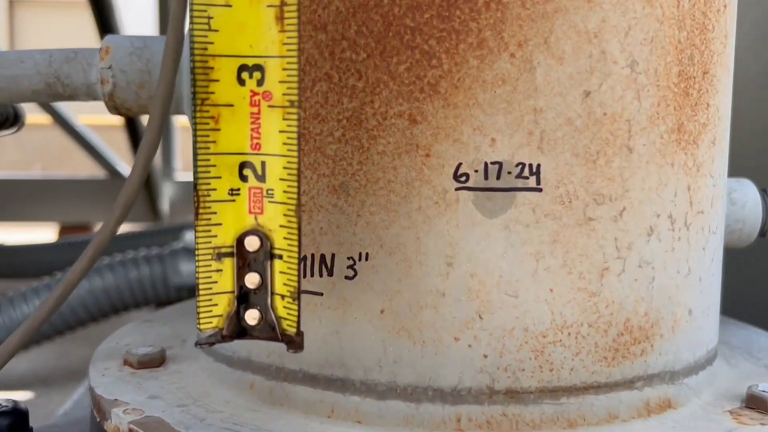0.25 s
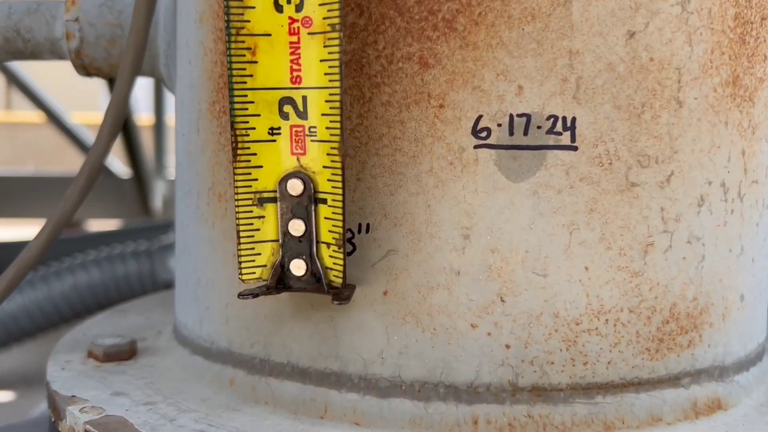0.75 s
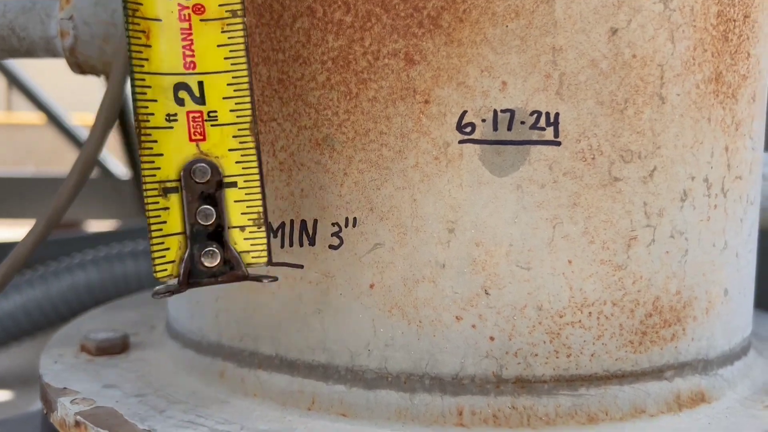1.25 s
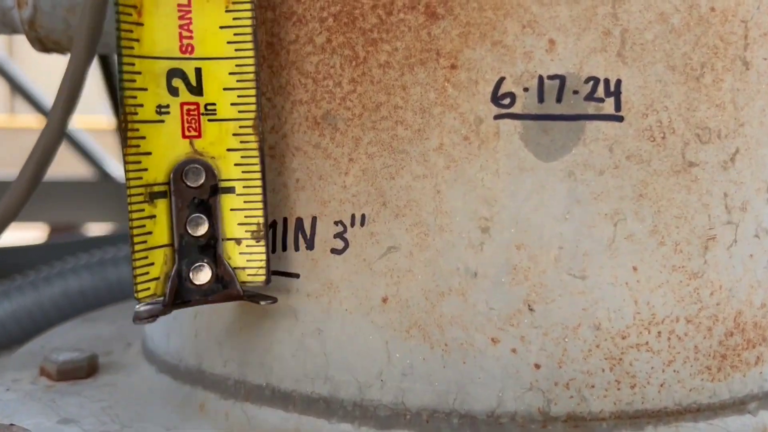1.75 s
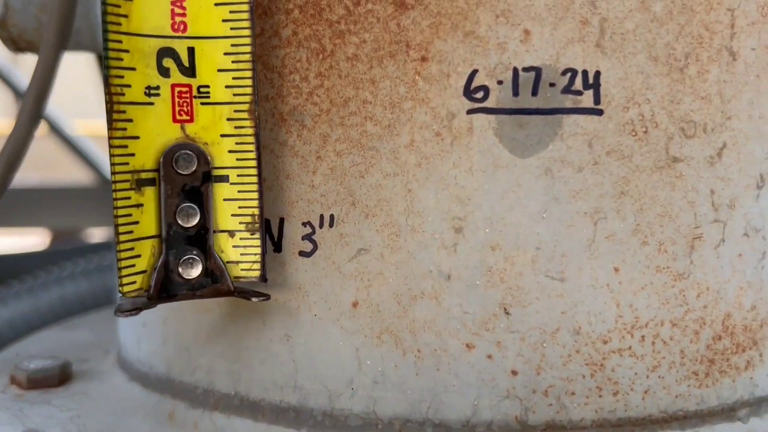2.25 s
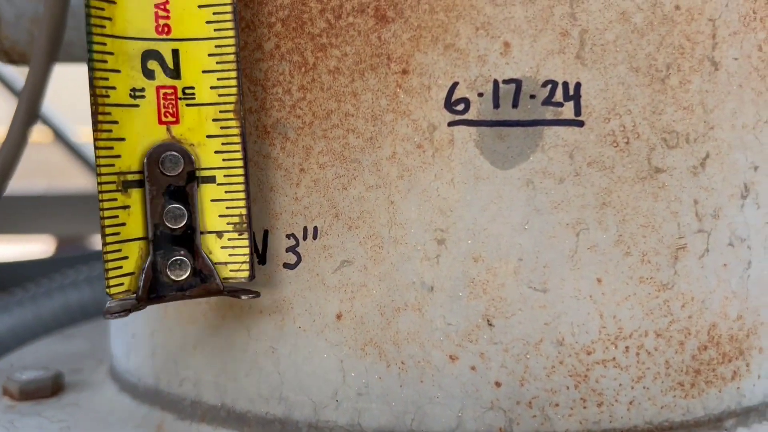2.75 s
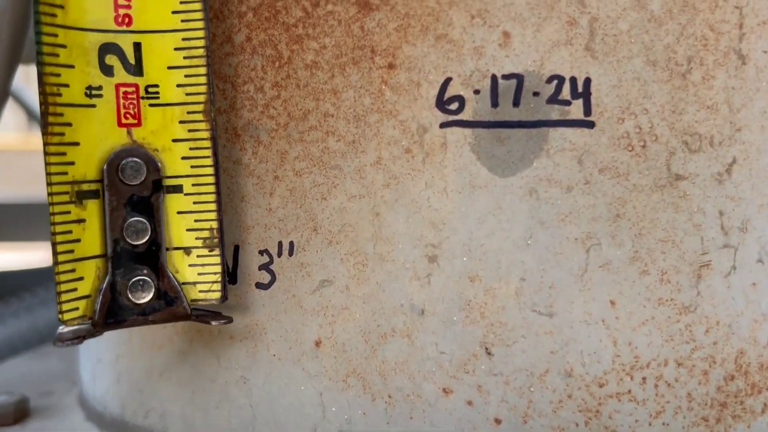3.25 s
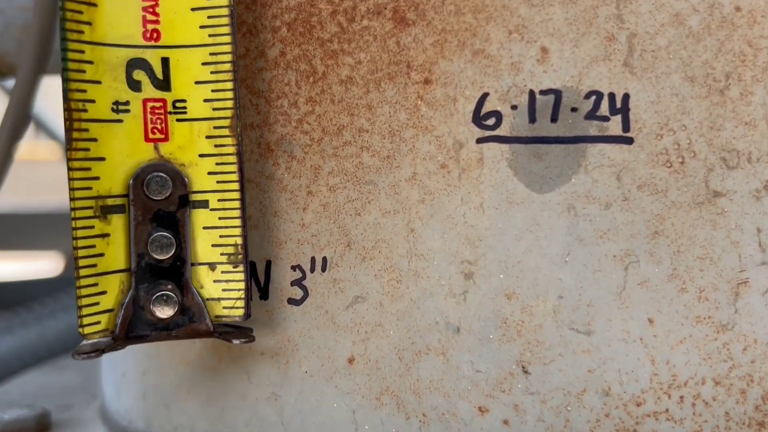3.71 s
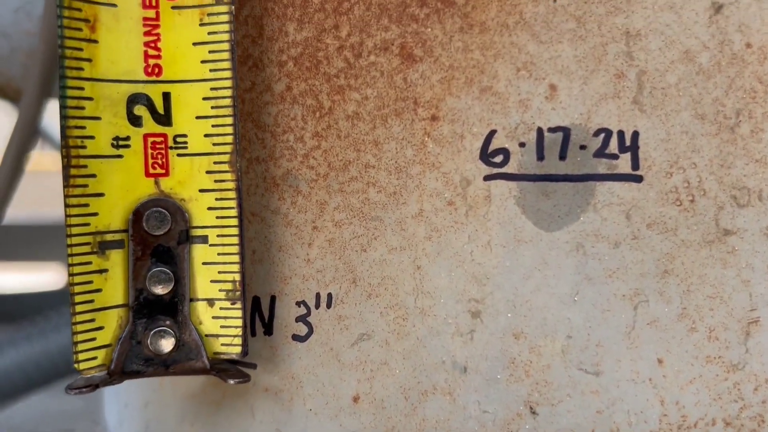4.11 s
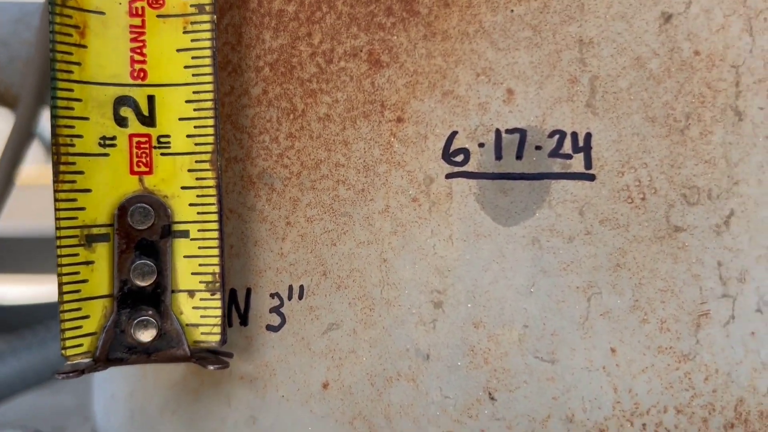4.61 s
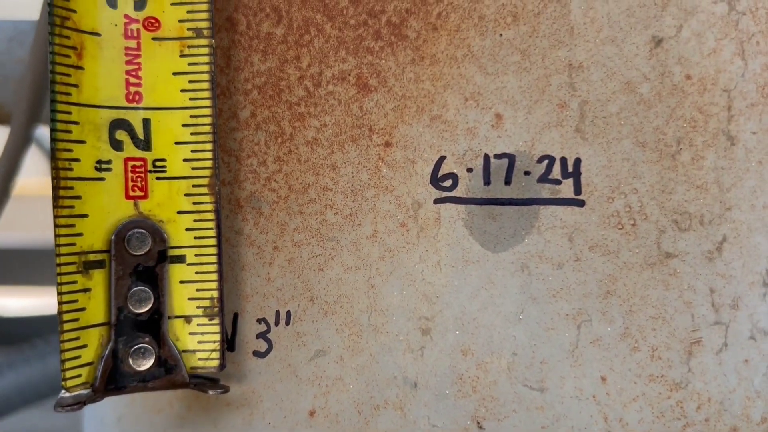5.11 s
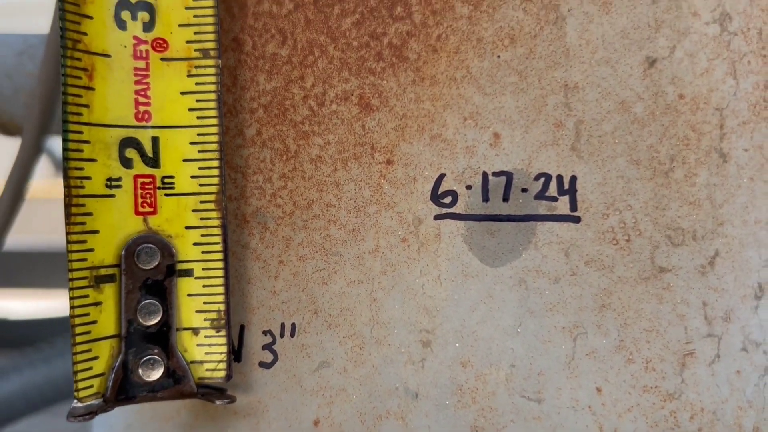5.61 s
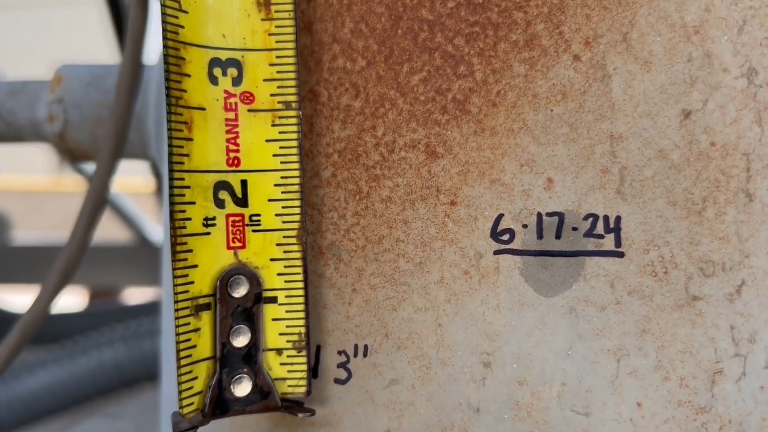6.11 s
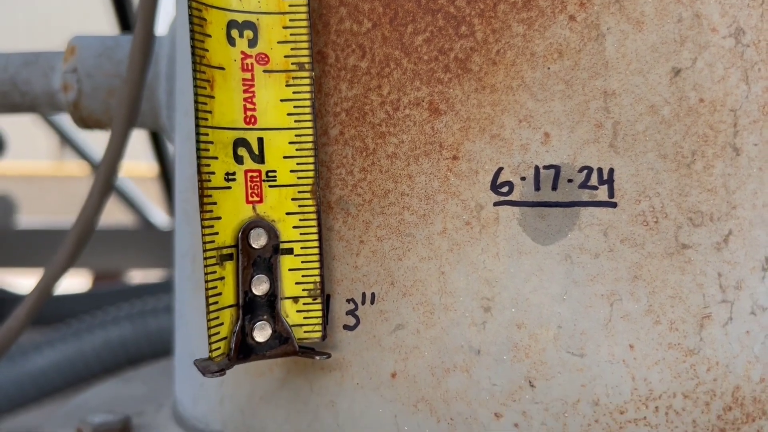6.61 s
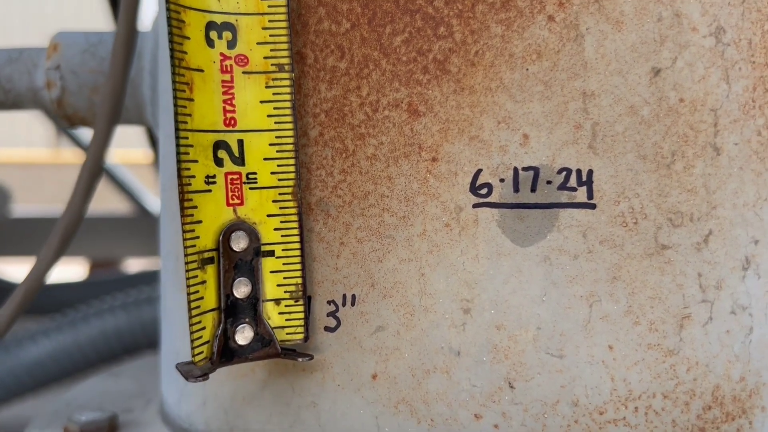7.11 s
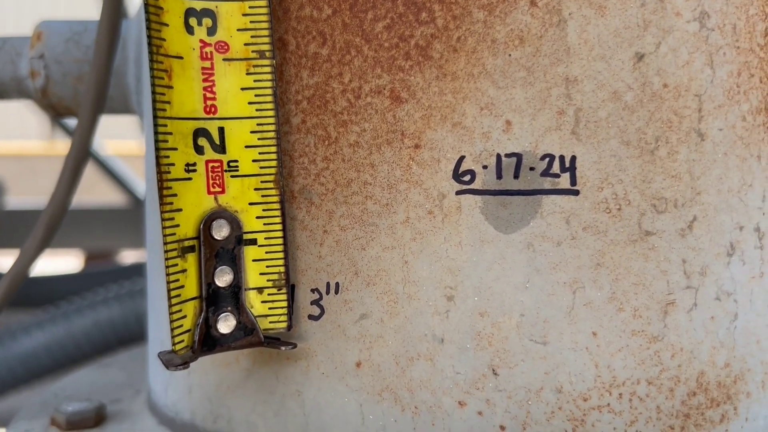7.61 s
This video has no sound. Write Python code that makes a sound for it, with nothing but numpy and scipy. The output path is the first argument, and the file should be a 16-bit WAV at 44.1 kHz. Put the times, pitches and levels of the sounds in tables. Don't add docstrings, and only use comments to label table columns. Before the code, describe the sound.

Close to a rooftop cooling machine, screw compressors drone and several fans throb low beneath a continuous broad rush of air and flowing refrigerant.

```python
import sys
import numpy as np
from scipy import signal
from scipy.fft import rfft, irfft, next_fast_len
from scipy.io import wavfile
from scipy.ndimage import uniform_filter1d

SR = 44100
rng = np.random.default_rng(int(sys.argv[2]) if len(sys.argv) > 2 else 0)


def invert_db(x):
    u = np.asarray(x, float) / 20
    return 10 ** u


def unload_wav(signal):
    wavfile.write(
        sys.argv[1],
        SR,
        np.round(np.clip(np.atleast_2d(signal).T, -1, 1) * 32767).astype(np.int16),
    )


N = 346273
SOUND_M_S = 343


def seconds():
    return np.arange(N) / SR


def walk(rate):
    hold = int(SR / rate)
    levels = np.repeat(rng.standard_normal(N // hold + 1), hold)
    slewed = uniform_filter1d(uniform_filter1d(levels, hold), hold)
    return 1.318 * slewed[:N]


def curve(table):
    s, value = np.transpose(table)
    return np.interp(seconds(), s, value)


def bumps(rows, width_s):
    return sum(db * np.exp(-((seconds() - s) / width_s) ** 2 / 2) for s, db in rows)


def shaft_angle(hz, wobble, rate):
    return 2 * np.pi * np.cumsum(hz * (1 + wobble * walk(rate))) / SR


def tone(angle, left_db, right_db, lead):
    left = invert_db(left_db) * np.sin(angle - lead)
    right = invert_db(right_db) * np.sin(angle)
    return np.sqrt(2) * np.array([left, right])


# frequency in Hz, level in dB per Hz, likeness of the ports from 0 to 1,
# right lead in radians, left minus right in dB.
ROAR_SPECTRUM = [(25, -76, .85, 0, -2), (49.7, -59.5, 1, 0, 4), (117, -49, 0.9, -0.15, -2.5),
                 (192, -52, 0.75, 0.49, -2), (349, -55.5, 0.74, 0.5, -0.5), (618, -57.5, 0.3, 3, -1),
                 (940, -62.5, 0.4, 3.5, -2), (1600, -65, 0.2, 4.5, -3.5), (1830, -69.5, 0.62, 7.5, 2.5),
                 (3700, -77.5, 0.34, 5, 2.5), (5260, -81.5, 0.46, 7.5, 5), (7300, -86.5, 0.7, 6.5, -0.5),
                 (9940, -88.5, 0.95, 9.5, 0), (16050, -96, 0.9, 15.7, .3)]
# time in seconds, level in dB.
REFRIGERANT_FLOW = [
    (0.0, -53),
    (0.22, -52.5),
    (4.0, -53.5),
    (4.09, -50.5),
    (4.22, -53.5),
    (4.3, -52),
    (5.73, -51),
    (7.34, -52),
    (7.39, -52),
    (7.85, -52),
]


def roar():
    size = next_fast_len(N)
    f = np.maximum(np.arange(size // 2 + 1) * SR / size, 1)
    hz, db, alike, lead, pan_db = np.transpose(ROAR_SPECTRUM)
    columns = (db, np.clip(alike, 0, 1), pan_db)
    db, alike, pan_db = (np.interp(np.log(f), np.log(hz), column) for column in columns)
    common, own = rfft(rng.standard_normal((2, size)))
    shared = alike * common * np.exp(1j * np.interp(f, hz, lead))
    right = shared + np.sqrt(1 - alike ** 2) * own
    air = np.array([common * invert_db(pan_db / 2), right * invert_db(-pan_db / 2)]) * invert_db(db) * np.sqrt(SR / 2)

    flow_db = curve(REFRIGERANT_FLOW)
    flow_db = flow_db - flow_db.mean()
    swell = walk(1.4)
    out = 0
    for centre in 20 * 2. ** np.arange(11):
        band = np.cos(np.pi / 2 * np.clip(np.log2(f / centre), -1, 1)) ** 2
        gust_db = 0.35 * swell + 0.72 * walk(10) + min(centre / 9000, 1) * flow_db
        out = out + invert_db(gust_db) * irfft(air * band, size)[:, :N]
    return out


# frequency in Hz, left in dB, right in dB, right lead in radians.
MOTOR_HUM = [(60.0, -43, -43, 0), (119.6, -46, -45, .2), (180.0, -48, -46, .3), (230.6, -49, -47, .3),
             (418.8, -45, -41, .5), (872.5, -49, -53, 3.1), (2708.3, -63, -68, -1.3),
             (3291.1, -60, -67, .1), (3651.3, -61, -66, 1.2), (6602.8, -68, -69, 0)]


def motor_hum():
    return sum(tone(2 * np.pi * hz * seconds(), *place) for hz, *place in MOTOR_HUM)


# blade tone in dB, its path in metres, second harmonic in dB, its path in metres.
FAN_TONES = [(-42, 0.69, -52, 2.36), (-55, 2.4, -47.5, 0.34), (-41.5, 6.17, -59, 1), (-45, 4.7, -43.5, 0.6),
             (-33.5, 1.65, -45, 2.46), (-33, 1.5, -47, 1.64), (-41, 2.2, -38, 2.38)]
BLADE_HZ = (56.749, 56.908, 57.034, 57.221, 57.452, 57.625, 57.746)
# time in seconds, change in dB.
FAN_SURGES = [
    (.55, 1),
    (1.55, 4.5),
    (2.0, -1),
    (2.65, 3),
    (6.5, -7),
    (7.7, 9),
]


def fans():
    t, out = seconds(), 0
    for hz, (db, path, second_db, second_path) in zip(BLADE_HZ, FAN_TONES):
        blade = 2 * np.pi * hz * (t - path / SOUND_M_S)
        second = 2 * 2 * np.pi * hz * (t - second_path / SOUND_M_S)
        out = out + tone(blade, db - 0.6, db + 0.5, 0.087)
        out = out + tone(second, second_db - 0.6, second_db + 0.5, 0.087)
        third_db = -46.5 + bumps(FAN_SURGES, width_s=0.15) + 2.24 * walk(4)
        third = 3 * shaft_angle(hz, wobble=0.006, rate=3.03)
        out = out + tone(third, third_db, third_db - 0.6, 0.1)
    return out


# shaft order, left in dB, right in dB, right lead
# in radians, far machines minus near in dB.
WEAK_ORDERS = [(9, -42, -43, 2.3, -4), (11, -46, -44.5, 2.2, -5), (15, -42, -41, -2.6, -2),
               (16, -55, -53, -2.7, -4), (19, -51, -51, -1.5, -4), (21, -52, -49, -.7, -4),
               (26, -49, -45.5, -2.2, -4), (28, -44, -48.5, .4, -3), (29, -55, -61, -.4, -6),
               (31, -46.5, -57, -.8, -11), (33, -57, -61, -.6, -6), (35, -46, -53, -.1, -8),
               (37, -56.5, -59, -.7, -6), (45, -53, -55, -.7, -3), (49, -61, -64, -.9, -6),
               (50, -51, -50.5, -.7, -4), (55, -56, -57.5, -1.2, -4), (60, -56, -57, -1.4, -4),
                    (65, -57, -59, -1.4, -5), (69, -66, -70, -.6, -5), (70, -59, -62.5, .2, -4),
                    (75, -56.5, -60, .5, -4), (80, -61, -63, -.2, -4), (85, -61, -64.5, -1.1, -4),
                    (90, -64, -69, .2, -4), (95, -65, -69, 1.6, -4), (100, -67, -72, 1.1, -4),
                    (105, -64, -69, .5, -4), (110, -68, -70, 0, -4), (125, -71, -72, .3, -4),
                    (135, -74, -75, 1.2, -4), (145, -74, -74, 1.8, -4)]


def chorus(angles, line, flicker_db):
    order, left_db, right_db, lead, others_db = line
    start = 2 * np.pi * rng.random((len(angles), 2))
    out = tone(order * angles[0] + start[0, 0], left_db, right_db, lead)
    for angle, (phase, side) in zip(angles[1:], start[1:]):
        far_lead = lead + 0.36 * (side - np.pi)
        out = out + tone(order * angle + phase, left_db + others_db, right_db + others_db, far_lead)
    return out * invert_db(flicker_db * min(order / 40, 1) * walk(14))


def weak_orders(angles):
    return invert_db(-3.5) * sum(chorus(angles, line, flicker_db=2.5) for line in WEAK_ORDERS)


# shaft order, ripples added, left in dB, right in dB,
# right lead in radians.
RIPPLE_SIDEBANDS = [(9.98, -1, -47.5, -44.5, -0.6), (10.01, 1, -44.5, -42, -0.4),
                    (24.97, 1, -42.5, -40, 2.5), (29.83, 0.81, -53, -58, 0), (30.04, 2.2, -49, -65, -0.5),
                    (4.995, 1, -53, -53, 0.5)]


def motor_sidebands(angles):
    ripple = 2 * np.pi * 120.0 * seconds()
    out = 0
    for order, count, left_db, right_db, lead in RIPPLE_SIDEBANDS:
        near = round(order) * angles[0] + count * ripple
        far = round(order) * angles[-1] + count * ripple
        out = out + tone(near, left_db, right_db, lead)
        out = out + tone(far, left_db - 15, right_db - 17.0, lead)
    return out


# time in seconds, rise over its rest in dB.
WHINE_FLARES = [(.05, 4.5), (.35, 3), (.63, 4), (1.14, 11.5), (1.45, 3), (1.87, 7), (3.12, 10.5), (3.35, 5),
                (4.12, 10.5), (4.38, 5), (4.97, 8), (5.6, 10), (5.9, 7.5), (6.88, 7), (7.75, 10)]


def pipe_whine(angles):
    db = -49.5 + bumps(WHINE_FLARES, width_s=0.066)
    left_db, right_db = db + 0.42, db + 0.4
    lead, far_db = 0.44 + 0.65 * walk(4.4), -4.5
    near = tone(40 * angles[0], left_db, right_db, lead)
    far = tone(40 * angles[-1], left_db + far_db, right_db + far_db, lead)
    return (near + far) * invert_db(2.2 * walk(24))


SHAFT_HZ = (58.9561, 58.873, 58.8163, 58.7408)
# time in seconds, metres nearer to the nearest machine.
PHONE_NEARER = [(0.0, -0.361), (0.4, -0.26), (0.8, -0.203), (1.2, -0.162), (1.6, -0.107), (2.1, -0.043),
                (2.6, -0.022), (3.1, 0.026), (3.7, 0.041), (4.3, 0.057), (4.9, 0.046), (5.5, 0.033),
                (6.1, -0.002), (6.5, -0.027), (6.9, -0.066), (7.4, -0.098), (7.85, -0.134)]


def lobe(order, paths, gain_db, flutter_db, rate):
    t, nearer = seconds(), curve(PHONE_NEARER)
    out = 0
    for hz, direct, wall in zip(SHAFT_HZ, paths, paths[len(SHAFT_HZ):]):
        for share, (left_db, right_db, lead, path) in ((1, direct), (0.506, wall)):
            arrival = t + (share * nearer - path) / SOUND_M_S
            out = out + tone(2 * np.pi * order * hz * arrival, left_db, right_db, lead)
    return out * invert_db(gain_db + flutter_db * walk(rate))


# left in dB, right in dB, right lead in radians, path in metres beyond whole waves.
LOBE_5 = [(-33.9, -37.0, -0.86, 0.501), (-50.6, -57.3, 1.41, 0.618), (-50.8, -48.7, -1.27, 0.23),
          (-57.3, -44.2, 1.06, 0.886), (-31.3, -27.5, -1.31, 0.51), (-48.7, -48.1, -0.17, 0.842),
          (-47.4, -63.0, -2.34, 0.951), (-46.8, -49.4, -2.19, 0.465)]
LOBE_10 = [(-33.9, -29.8, -0.63, 0.233), (-34.9, -42.4, -1.74, 0.446), (-51.1, -46.3, -1.23, 0.007),
           (-46.6, -48.7, -0.44, 0.505), (-34.5, -28.1, -1.82, 0.149), (-36.3, -46.4, -1.5, 0.158),
           (-42.7, -46.4, 2.81, 0.184), (-47.2, -48.8, -0.03, 0.399)]
LOBE_20 = [(-49.3, -45.6, -0.95, 0.204), (-43.4, -36.7, -0.04, 0.059), (-62.0, -56.7, 0.61, 0.131),
           (-58.6, -54.3, -2.68, 0.056), (-49.2, -46.6, -1.46, 0.026), (-46.6, -46.5, 0.42, 0.077),
           (-50.9, -44.2, -0.47, 0.111), (-58.7, -47.3, 2.42, 0.089)]
LOBE_25 = [(-44.6, -45.8, -0.67, 0.217), (-57.5, -48.0, 0.54, 0.014), (-59.7, -60.7, 0.78, 0.011),
           (-70.1, -57.2, 0.42, 0.027), (-60.2, -45.1, -0.68, 0.177), (-65.4, -47.7, -1.31, 0.135),
           (-60.2, -52.5, 1.52, 0.233), (-83.0, -60.4, 1.56, 0.206)]
LOBE_30 = [(-47.7, -59.2, -0.71, 0.188), (-70.7, -70.3, 1.43, 0.036), (-64.6, -75.2, -1.21, 0.087),
           (-65.9, -88.4, -2.87, 0.001), (-45.1, -61.4, -0.12, 0.187), (-65.1, -74.1, 2.75, 0.154),
           (-62.6, -79.7, -1.19, 0.12), (-66.8, -80.4, -0.89, 0.049)]
# time in seconds, change in dB.
SWELLS_10 = [(.95, -5), (1.12, -3), (1.27, -7), (1.4, -10), (2.2, 3), (2.74, -11), (3.5, 1.5), (4.15, -4),
             (5.58, -6), (5.85, -2), (6.5, -12), (6.7, -4), (6.82, -3), (6.98, -5), (7.3, 2), (7.7, 3)]
SWELLS_20 = [(.1, 3.5), (.6, 6), (1.2, 6), (2.27, -5), (2.63, 1.5), (3.83, -4), (4.1, 4.5), (5.95, 2.5),
             (6.12, -5), (6.55, -11), (6.9, 1.5), (7.8, 4.5)]
SWELLS_25 = [
    (.85, 4),
    (1.4, 5),
    (1.9, 9.5),
    (2.15, 5.5),
    (2.8, 6),
    (6.15, -4),
    (7.8, 10),
]


def lobe_tones():
    swell_s = 0.06
    out = lobe(5, LOBE_5, gain_db=0.17, flutter_db=0.9, rate=9)
    out = out + lobe(10, LOBE_10, gain_db=0.76 + bumps(SWELLS_10, swell_s), flutter_db=1.06, rate=18)
    out = out + lobe(20, LOBE_20, gain_db=0.4 + bumps(SWELLS_20, swell_s), flutter_db=1.3, rate=22)
    out = out + lobe(25, LOBE_25, gain_db=0.6 + bumps(SWELLS_25, swell_s), flutter_db=2.0, rate=22)
    return out + lobe(30, LOBE_30, gain_db=1.3, flutter_db=2.5, rate=18)


def compressors():
    nearer = curve(PHONE_NEARER)
    angles = []
    for hz in SHAFT_HZ:
        advance = 2 * np.pi * hz * nearer / SOUND_M_S
        angles.append(shaft_angle(hz, wobble=0.0002977, rate=9) + advance)
    return weak_orders(angles) + motor_sidebands(angles) + pipe_whine(angles) + lobe_tones()


def scene():
    return roar() + motor_hum() + fans() + compressors()


def top_cut(x):
    return signal.sosfilt(signal.butter(12, 15720, fs=SR, output="sos"), x)


def record(dry):
    bass_cut = signal.butter(2, 30, "high", fs=SR, output="sos")
    phone = signal.sosfilt(bass_cut, dry)
    return top_cut(phone)


dry = scene()
out = record(dry)
unload_wav(out)
```